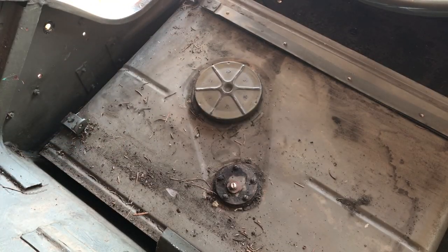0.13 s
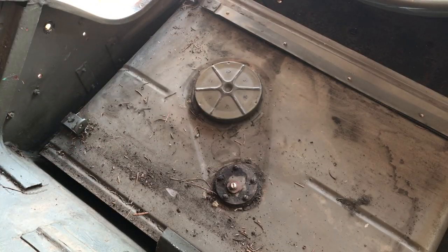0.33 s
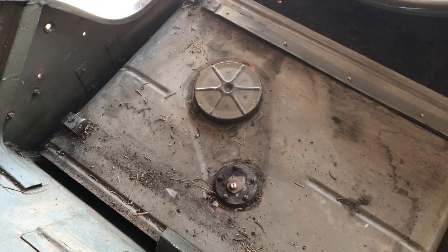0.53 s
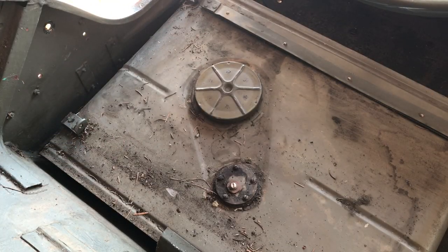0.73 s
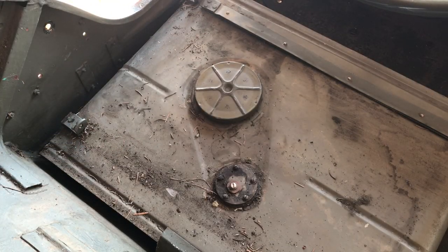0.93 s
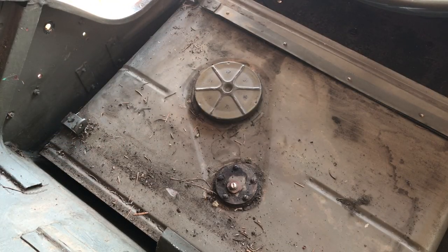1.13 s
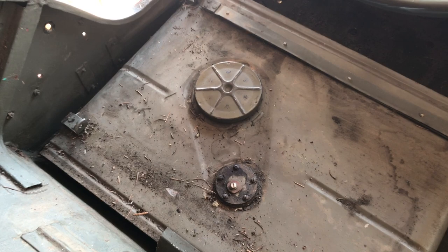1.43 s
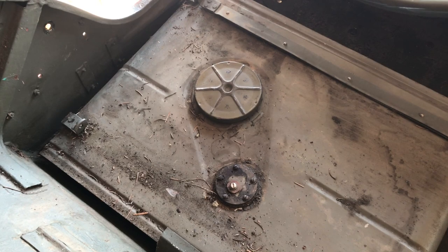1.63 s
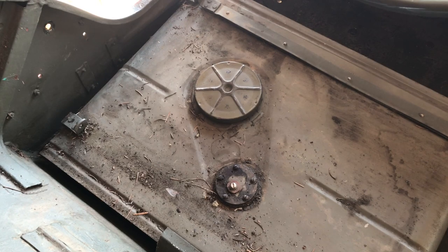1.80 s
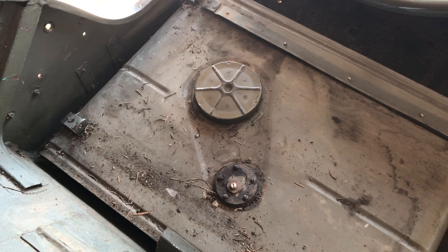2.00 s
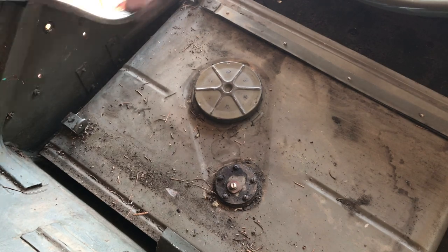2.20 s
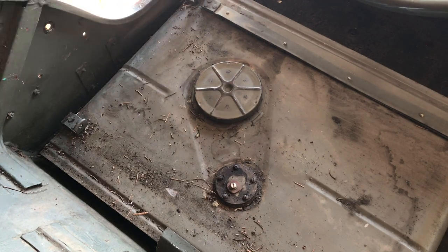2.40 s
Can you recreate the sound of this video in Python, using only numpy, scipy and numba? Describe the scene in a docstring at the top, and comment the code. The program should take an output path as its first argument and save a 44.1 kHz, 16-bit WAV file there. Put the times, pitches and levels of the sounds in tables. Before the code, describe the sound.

A metal strap knocks twice on a vehicle's sheet-metal panel, clanking with a short hollow ring.

```python
"""A quiet workshop: a steel strap knocks twice, with softer bounces, on a vehicle's sheet-metal tub.
The panel rings as fading sine waves, a few clear and many weak, and its bass swells late.
The strap adds a dull clank of short sines and a snap of noise bands. Shaped noise makes the low room
rumble and the hiss of a small camera, which also adds a steady offset. A wavering sine makes a thin
hum, and noise through moving filters makes two short rustles."""
import sys
import numpy as np
from scipy import signal
from scipy.fft import rfft, irfft
from scipy.io import wavfile
from scipy.ndimage import uniform_filter1d
from numba import njit

SR = 44100
rng = np.random.default_rng(int(sys.argv[2]) if len(sys.argv) > 2 else 0)


def elevation(decibels):
    """Turn decibel levels (scalar or array-like) into linear amplitude ratios."""
    levels = np.asarray(decibels, float)
    return 10 ** (levels / 20)


def unload_audio(sound):
    """Save the sound as a 16-bit wav file, at the path given as the first command line argument."""
    columns = np.transpose(np.atleast_2d(sound))
    # keep every value between -1 and 1, then stretch to whole-number steps
    steps = np.round(np.clip(columns, -1, 1) * 32767)
    wavfile.write(sys.argv[1], SR, steps.astype(np.int16))


N = 112454

# Room rumble and camera hiss. Each row: pitch in Hz, level in dB per Hz.
FLOOR = [(15, -101), (28, -81.5), (50, -90.5), (68, -79.5), (95, -84.5), (130, -95), (190, -112),
         (235, -110), (265, -99), (330, -100), (600, -102), (1500, -105), (4000, -107), (10000, -109),
         (17000, -110)]
# Loudness of the hum over time. Each row: time in seconds, middle level in dB.
HUM_LEVEL = [(0, -86), (.6, -86), (.8, -75), (1.0, -71), (1.9, -76), (2.2, -76.5), (2.55, -75.5)]
# Blows of the strap. Each row: start in seconds, level in dB, contact brightness in Hz,
# spot on the panel from 0 to 1, level of the metal-on-metal snap in dB.
BLOWS = [(1.0752, -29, 9200, 0., -40.5), (1.0793, -39, 5000, 0.5, -59), (1.108, -43, 1200, 0.2, -66),
         (1.271, -39.5, 357, 0.75, -78), (1.325, -48.5, 350, 0.54, -80), (1.4162, -34.5, 2950, 0.87, -53),
         (1.4203, -38.5, 3420, 0.75, -52.5), (1.452, -39, 2490, 0.81, -62), (1.512, -49.5, 406, 1., -76),
         (1.573, -53.5, 465, 0.7, -76), (2.105, -68, 900, 1., -85)]
# Clear ways the panel rings (modes). Each row: pitch in Hz, time to fade by 60 dB in seconds
# when struck at spot 0, level in dB struck at spot 0, level in dB struck at spot 1.
CLEAR_MODES = [(76.3, 0.84, -16, -13.5), (110.8, 0.33, -18.5, -13), (169, 1.17, -24, -19),
               (190, 1.25, -17.5, -17.5), (232, 1.3, -26, -20), (221.5, 0.55, -6, -1),
               (246.2, 0.52, -13, -6), (299, 0.23, -3.5, -1), (350, 2.1, -25, -27),
               (371.7, 0.32, -11, -13.5), (442.4, 0.52, -17.5, -8), (495.3, 0.43, -10, -11),
               (513, 0.33, -16, -1.5), (634, 0.55, -27, -11), (703, 0.34, -13, -13), (736, 0.36, -4, -16.5),
               (774.6, 0.35, -7, -14), (855, 0.21, 2, -12.5), (925.4, 0.2, -5.5, -15), (976, 0.18, -5, -11),
               (1058, 0.49, -18.5, -20), (1156, .3, -10, -26), (1437, 0.17, -32, -8),
               (1594, 0.48, -19, -15.5), (1814, 0.27, -15, -41), (2047, 0.14, -5, -43),
               (2420, 0.17, -28, -20), (6400, .05, -28, -19.5)]
# Crowd of weak modes. Each row: pitch in Hz, level of each mode in dB struck at spot 0,
# the same at spot 1, time to fade by 60 dB in seconds when struck at spot 0.
WEAK_MODES = [(61.5, -27, -27, 1), (120, -23.5, -28, 1), (298, -15.5, -17.5, 0.48),
              (550, -24.5, -21.5, 0.51), (900, -16, -17.5, 0.46), (1500, -20.5, -13.5, 0.32),
              (2010, -20.5, -35, 0.38), (2750, -24.5, -25, 0.27), (3540, -32, -39.5, 0.33),
              (5550, -36, -38, 0.3), (8000, -40.5, -46, 0.33), (14000, -60, -60, .15)]
# The strap's own dead clank. Each row: middle pitch in Hz, level in dB, time to fade by 60 dB in seconds.
STRAP = [(890, 3.5, 0.043), (1227, 6, 0.021), (1700, 3, 0.037), (2130, -0.5, 0.028), (3100, -13.5, 0.044)]
# Noise bands of the snap. Each row: pitch in Hz, level in dB, time to fade by 60 dB in seconds.
SNAP = [(5090, -4.5, 0.03), (6090, 0, .035), (7730, -7.5, 0.051), (10800, -13, .04)]
# Rustles. Each row: start in seconds, length in seconds, level in dB, first pitch in Hz, last pitch in Hz.
RUSTLES = [(2.107, 0.11, -67, 1700, 2500), (2.519, .05, -67.5, 1500, 2300)]

RUMBLE_FLICKER_DB = 0.5
HUM_HZ = 350
SWELL_S_AT_100HZ, SWELL_POWER = 0.023, 1.66  # swell-in time constant; shorter for higher modes
TWIN_HZ, TWIN_DB = 9.04, -4.5  # middle detuning and relative level of each clear mode's twin
HELD_DAMP = 0.88  # ring time at spot 1 as a share of that at spot 0
WAVER_DB, WAVER_HZ = 1.54, 40.02  # the loose strap makes the ringing waver
SNAP_RISE_S = 0.0014
RUSTLE_TREBLE_HZ, RUSTLE_TREBLE_DB = 4540, -2
OFFSET = -.095  # steady shift of the whole wave, full scale = 1


def curve(hz, table, col):
    """Read a table column at the given pitches, joining its rows on a log pitch axis."""
    table = np.array(table, float)
    return np.interp(np.log(np.maximum(hz, 1e-3)), np.log(table[:, 0]), table[:, col])


def unit(x):
    """Scale a signal so its average power is 1."""
    return x / np.sqrt(np.mean(x ** 2))


def walk(rate):
    """Slow random wandering of spread 1: random steps, about `rate` a second, smoothed together."""
    hold = int(SR / rate)
    steps = np.repeat(rng.standard_normal(N // hold + 1), hold)
    return unit(uniform_filter1d(steps, hold)[:N])


def floor():
    """Noise coloured by pitch: the room's bass wanders in level, the hiss stays smooth."""
    hz = np.fft.rfftfreq(N, 1 / SR)
    spectrum = rfft(rng.standard_normal(N)) * elevation(curve(hz, FLOOR, col=1)) * np.sqrt(SR / 2)
    bass_share = 1 / (1 + (hz / 160) ** 4)
    rumble = irfft(spectrum * bass_share, N)
    hiss = irfft(spectrum * (1 - bass_share), N)
    return rumble * elevation(RUMBLE_FLICKER_DB * walk(9)) + hiss


def hum():
    """A thin sine, slightly wavering in pitch and level, that comes up before the knocks."""
    t = np.arange(N) / SR
    turns = np.cumsum(HUM_HZ * (1 + .004 * walk(12))) / SR
    level_db = np.interp(t, *np.array(HUM_LEVEL).T) + 1.6 * walk(18)
    return np.sqrt(2) * elevation(level_db) * np.sin(2 * np.pi * turns)


def soften(hz, bright_hz):
    """A softer contact excites less treble: the gain falls above its brightness."""
    return 1 / (1 + (hz / bright_hz) ** 2)


@njit
def add_ringing(out, start, size, hz, t60, swell):
    """Add sines that swell in and fade, as struck metal does, from one sample on."""
    for m in range(len(hz)):
        # multiplying by this complex number turns the wave one sample onward and fades it
        turn = np.exp(2j * np.pi * hz[m] / SR - np.log(1000) / (t60[m] * SR))
        swell_step, z, lack = np.exp(-1 / (swell[m] * SR)), size[m], 1.
        for i in range(start, min(len(out), start + int(1.2 * t60[m] * SR))):
            z *= turn
            lack *= swell_step
            out[i] += z.imag * (1 - lack)


def panel(count=340):
    """Every blow rings the same modes; its spot and contact brightness weight them."""
    clear = np.array(CLEAR_MODES, float)
    # a slightly detuned twin makes each clear mode beat
    detune = rng.choice([-1, 1], len(clear)) * (.5 + rng.random(len(clear)))
    twins = clear + np.outer(detune, [TWIN_HZ, 0, 0, 0]) + [0, 0, TWIN_DB, TWIN_DB]
    clear = np.r_[clear, twins]

    place = (np.arange(count) + rng.random(count)) / count
    weak_hz = 60 * (14000 / 60) ** (place ** .62)  # packed closer toward the treble
    hz = np.r_[clear[:, 0], weak_hz]
    t60 = np.maximum(np.r_[clear[:, 1], curve(weak_hz, WEAK_MODES, col=3)], .01)
    at0 = np.r_[clear[:, 2], curve(weak_hz, WEAK_MODES, col=1)]
    at1 = np.r_[clear[:, 3], curve(weak_hz, WEAK_MODES, col=2)]
    swell = SWELL_S_AT_100HZ * (100 / hz) ** SWELL_POWER

    rings = np.zeros((3, N))  # three groups of modes that waver separately
    for s, db, bright_hz, spot, _ in BLOWS:
        spot = np.clip(spot, 0, 1)
        phase, scatter = rng.random((2, len(hz)))
        level_db = db + (1 - spot) * at0 + spot * at1 + 2.9 * (scatter - .5)
        size = elevation(level_db) * soften(hz, bright_hz) * np.exp(2j * np.pi * phase)
        held_t60 = t60 * HELD_DAMP ** spot
        for k, ring in enumerate(rings):
            group = [v[k::3].copy() for v in (size, hz, held_t60, swell)]
            add_ringing(ring, int(s * SR), group[0], group[1], group[2], group[3])
    return sum(ring * elevation(WAVER_DB * walk(WAVER_HZ)) for ring in rings)


def strap_clank():
    """The strap rings dully: a few fast-fading sines, each shifted a little in pitch by chance."""
    out, strap = np.zeros(N), np.array(STRAP, float)
    for s, db, bright_hz, _, _ in BLOWS:
        hz = strap[:, 0] * (1 + 0.081 * (rng.random(len(strap)) - .5))
        size = elevation(db + strap[:, 1]) * soften(hz, bright_hz) + 0j
        add_ringing(out, int(s * SR), size, hz, strap[:, 2].copy(), 0.51 / hz)
    return out


def snap():
    """Metal meeting metal: bands of noise that rise at once and fade fast."""
    out, t = np.zeros(N), np.arange(4096) / SR
    for s, _, _, _, snap_db in BLOWS:
        i, noise = int(s * SR), rng.standard_normal(4096)
        for hz, band_db, t60 in SNAP:
            peak = signal.iirpeak(hz, 2.5, SR)
            band = unit(signal.lfilter(*peak, signal.lfilter(*peak, noise)))
            fade = elevation(snap_db + band_db - 60 * t / t60)
            out[i:i + 4096] += fade * (1 - np.exp(-t / SNAP_RISE_S)) * band
    return out


def rustles():
    """Brief soft scuffs: noise cross-fades from a lower band to a higher one, with an airy top."""
    out = np.zeros(N)
    for s, length, db, first_hz, last_hz in RUSTLES:
        progress = np.clip((np.arange(N) / SR - s) / length, 0, 1)
        bands = zip((first_hz, last_hz, RUSTLE_TREBLE_HZ), (3., 3., .8), rng.standard_normal((3, N)))
        first, last, air = (unit(signal.lfilter(*signal.iirpeak(f, q, SR), v)) for f, q, v in bands)
        colour = first * (1 - progress) + last * progress + elevation(RUSTLE_TREBLE_DB) * air
        out += elevation(db) * np.sin(np.pi * progress ** 0.83) * colour
    return out


def scene():
    """Add all the sources at one microphone."""
    return (floor() + hum() + panel() + strap_clank() + snap() + rustles())[None]


def low_pass(x):
    """Removes everything above the highest recorded frequency."""
    return signal.sosfilt(signal.butter(12, 15870, fs=SR, output="sos"), x)


def record(dry):
    """The camera shifts the whole wave by a steady offset."""
    mix = dry + OFFSET
    return low_pass(mix)


dry = scene()
out = record(dry)
unload_audio(out)
```